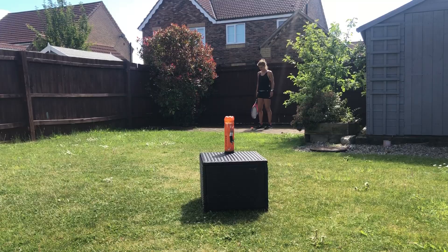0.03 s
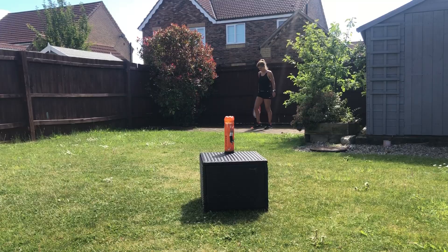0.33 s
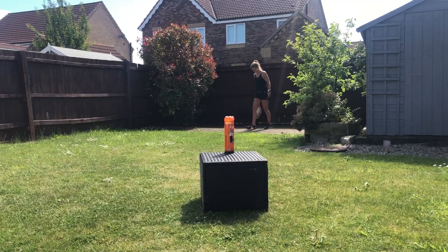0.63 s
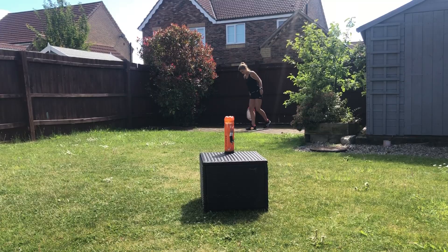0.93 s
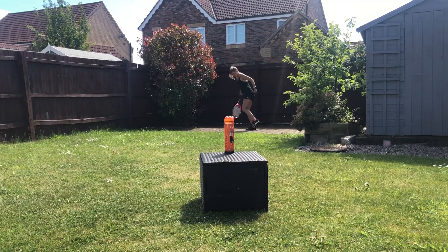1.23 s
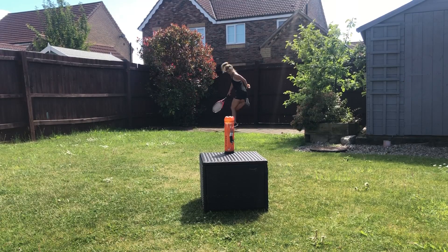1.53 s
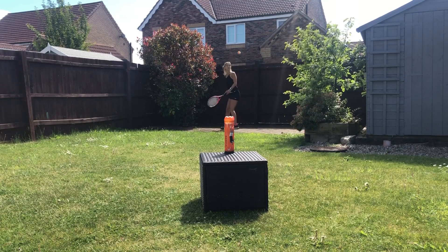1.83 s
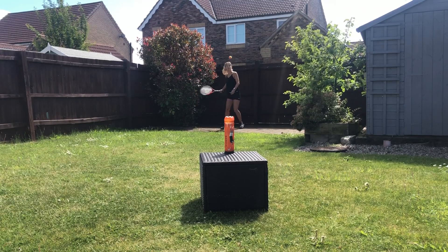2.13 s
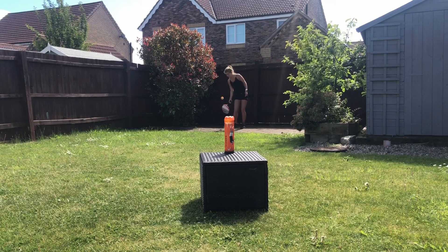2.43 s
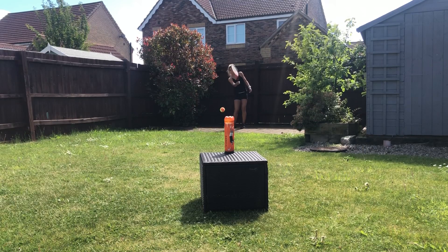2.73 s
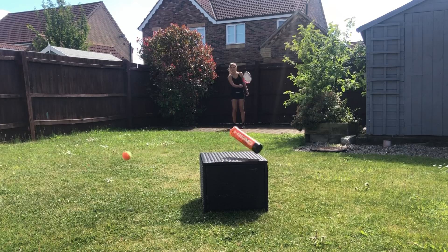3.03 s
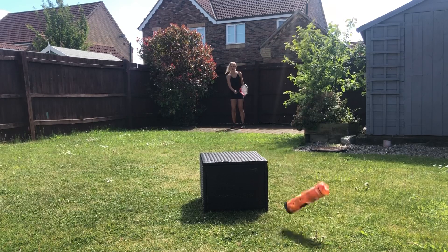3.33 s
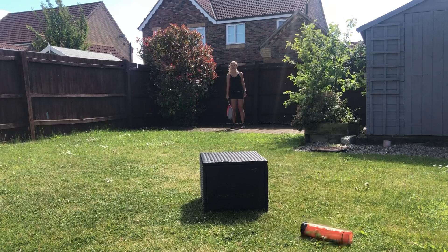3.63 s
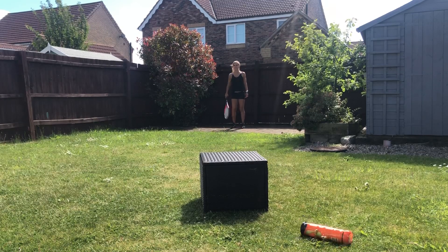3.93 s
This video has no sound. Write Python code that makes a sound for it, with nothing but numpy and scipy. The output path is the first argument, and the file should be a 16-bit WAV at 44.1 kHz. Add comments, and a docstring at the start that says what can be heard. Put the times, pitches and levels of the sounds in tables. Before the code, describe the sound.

A ball cracks against a hollow plastic tube, knocking it onto grass, with faint birds.

```python
"""A fenced garden: at the far end of the lawn a player bounces a ball and hits it with a racket.
The ball knocks a plastic tube off a box near the microphone; the tube clips the box, lands on the
grass and hops. The blows are ringing modes plus contact noise, and fence and walls answer them.
Small birds whistle among the houses over quiet air and a faint machine hum."""
import sys
import numpy as np
from scipy import signal
from scipy.fft import rfft, irfft
from scipy.io import wavfile
from scipy.ndimage import map_coordinates

SR = 44100
rng = np.random.default_rng(int(sys.argv[2]) if len(sys.argv) > 2 else 0)


def file_out(sig):
    """Save sig as 16-bit WAV at sys.argv[1]."""
    # one column per channel
    cols = np.atleast_2d(sig).T
    # limit, then scale
    lim = np.clip(cols, -1, 1)
    pcm = np.round(lim * 32767).astype(np.int16)
    wavfile.write(sys.argv[1], SR, pcm)


N = 176400
T = np.arange(22050) / SR  # time within one blow [s]
BOUNCE_AT, RACKET_AT, TUBE_AT, CLIP_AT, GRASS_AT, LANDING_AT = 1.581, 2.573, 2.9594, 3.1297, 3.419, 3.433

# Hollow ring of the tube, then of the box (pitch [Hz], relative level [dB], t60 [s])
TUBE_MODES = [(170.8, -5, .26), (229, -3, 0.11), (270, -2.5, 0.13), (494, -15, 0.15), (678, -8.5, 0.13),
              (888, -6, 0.12), (1017, -5.5, .12), (1086.5, 1, 0.09), (1157, -2.5, .14), (1526, -12.5, .14),
              (1605, -15.5, .14), (1836, -10.5, 0.13), (2096, -11.5, .1), (2524, -12, .1)]
BOX_MODES = [(229, -1, 0.091), (342, 0.5, 0.12), (426, -14, 0.08)]
# Smack of ball on tube, then of tube on box (frequency [Hz], relative level [dB])
TUBE_NOISE = [(25, -50), (60, -16), (130, -3.5), (280, -4), (550, -17.5), (850, -3), (1150, -2.5),
              (1400, -12), (2050, -7), (3200, -17), (4800, -20), (6500, -29.5), (10000, -32), (15500, -34)]
BOX_NOISE = [(59, -38), (100, -7), (355, 0), (508, -5), (1160, -7), (1400, -12), (2040, -11), (2690, -19),
             (3850, -17.5), (15500, -30)]
def tube_hit():
    """The ball cracks on the hollow tube and sets it ringing; the falling tube clips the box."""
    out = np.zeros(N)
    add(out, TUBE_AT, garden(amp(-16.5) * ring(TUBE_MODES, rise_s=.0033), walls_db=-19, tail_db=-18))
    add(out, TUBE_AT, amp(-9.5) * burst(TUBE_NOISE, rise_s=.0015, stretch=.92, tail_db=-15.5))
    add(out, TUBE_AT, garden(amp(-14) * crack(t60=.0038), walls_db=-6, tail_db=-12.5))
    shed_echo = burst(TUBE_NOISE, rise_s=.006, stretch=.7, tail_db=-22.5)
    add(out, TUBE_AT + .026, amp(-21) * shed_echo)
    add(out, CLIP_AT, amp(-35.5) * burst(BOX_NOISE, rise_s=.002, stretch=1.24, tail_db=-14))
    add(out, CLIP_AT, garden(amp(-25.5) * crack(t60=.0038), walls_db=-10, tail_db=-15))
    add(out, CLIP_AT + .00843, amp(-35) * ring(BOX_MODES, rise_s=.0038))
    return out


# Dull knock of the tube on the lawn (pitch [Hz], relative level [dB], t60 [s])
LANDING_MODES = [(157.6, -1, 0.095), (296, 1, 0.1), (364, -5, 0.14), (477, 7, 0.051), (566, -4.5, 0.1),
                 (875, -9, 0.079), (1077, -8, 0.095)]
# Crunch of blades, thump of the tube's end, slap of its side (frequency [Hz], relative level [dB])
GRASS = [(300, -11.5), (1500, -11.5), (4400, -3), (7000, -11.5), (15000, -14.5)]
THUMP = [(35, -41), (60, -1.5), (162, -14), (234, 7.5), (302, 0), (428, -5.5), (591, 0.5), (780, -5.5),
         (1080, -12), (1520, -22), (15000, -42.5)]
SLAP = [(40, -46), (300, -27), (600, 4), (1100, -3.5), (1600, -25), (15000, -55)]
def tube_landing():
    """The tube crushes the grass and lands end first; its side slaps down just after."""
    out = np.zeros(N)
    blades = noise(GRASS, len(T)) * amp(4.5 * wobble(1210, len(T))) * fade(rise_s=.005, t60=.035)
    add(out, GRASS_AT, garden(amp(-26) * blades, walls_db=-16, tail_db=-12))
    knock = amp(-24.5) * ring(LANDING_MODES, rise_s=.0017)
    add(out, LANDING_AT, garden(knock, walls_db=-18, tail_db=-14.5))
    add(out, LANDING_AT, amp(-21) * burst(THUMP, rise_s=.0042, stretch=1.3, tail_db=-18.5))
    add(out, LANDING_AT + .009, amp(-22) * burst(SLAP, rise_s=.00092, stretch=.63, tail_db=-24.5))
    return out


RATTLES = [(2.963, -28), (2.9668, -25), (2.973, -25), (2.9856, -31), (2.9945, -30.5), (3.132, -39),
           (3.1372, -40), (3.1415, -41)]
GRASS_TICKS = [(.133, -53.5), (3.589, -51), (3.746, -51.5)]
def rattles():
    """Quick secondary contacts of the tube, and blades of grass snapping, close by and dry."""
    out = np.zeros(N)
    for s, db in RATTLES:
        add(out, s, amp(db) * crack(t60=.018))
    for s, db in GRASS_TICKS:
        add(out, s, amp(db) * noise(GRASS, len(T)) * fade(rise_s=.00091, t60=.043))
    return out


# Bright edge of hard plastic (frequency [Hz], relative level [dB])
CRACK = [(30, -41), (300, -17), (2000, 5), (6000, -5), (11500, -3.5), (16000, -7)]
def crack(t60):
    """The first instant of a hard contact: noise with an instant attack."""
    return noise(CRACK, len(T)) * np.exp(-np.log(1000) * T / t60)


# Body of the bounce, then of the racket (pitch [Hz], relative level [dB], t60 [s])
PAVING_MODES = [(256, -1.5, 0.093), (344, -1.5, 0.078), (473, -2.5, 0.064)]
RACKET_MODES = [(198, -2.5, .12), (305, 2.5, .04), (725, -2.5, .07), (925, 0, 0.059), (1304, -12.5, .08),
                (1864, -16, .07), (2515, -19, 0.09)]
# Punch of the same two blows (frequency [Hz], relative level [dB])
PAVING_NOISE = [(59, -51), (100, -12.5), (231, 1.5), (337, -9), (492, -20), (558, -13), (1070, -22),
                (2130, -24.5), (15000, -58.5)]
RACKET_NOISE = [(30, -45), (90, -17.5), (150, -3.5), (300, -1.5), (520, -8.5), (900, 1.5), (1600, -17.5),
                (2200, -20), (4500, -23), (7700, -27.5), (15000, -42)]
def player():
    """Far off, the ball bounces on the paving, echoed by the house, and is then struck by the racket."""
    out = np.zeros(N)
    for delay, db, rise_s in [(0, 3, .00069), (.038, -.5, .007)]:  # bounce, house echo
        contact = burst(PAVING_NOISE, rise_s, stretch=.94, tail_db=-7.5)
        body = garden(ring(PAVING_MODES, rise_s=.0019), walls_db=-15, tail_db=-9.5)
        add(out, BOUNCE_AT + delay, amp(db - 36.5) * contact)
        add(out, BOUNCE_AT + delay + .00695, amp(db - 34.5) * body)
    add(out, RACKET_AT, amp(-30) * garden(ring(RACKET_MODES, rise_s=.003), walls_db=-6, tail_db=-7))
    add(out, RACKET_AT, amp(-28) * burst(RACKET_NOISE, rise_s=.001, stretch=1.1, tail_db=-10))
    return out


# Light steps and taps (time [s], low level [dB], mid level [dB], high level [dB])
TAPS = [(1.187, -49.5, -63, -76), (1.238, -60, -58, -60), (1.862, -41, -53, -70), (1.9, -48.5, -55.5, -76),
        (2.063, -47, -55, -77), (2.1, -47.5, -58.5, -69), (2.719, -45, -58, -62),
        (3.224, -50, -54.5, -59.5), (3.637, -38, -64, -58), (3.746, -54, -50.5, -66.5)]
# Their low, mid and high colours, each a list of (frequency [Hz], relative level [dB])
TAP_BANDS = [
    [(25, -50), (70, -32.5), (200, 9), (500, 2), (1100, -34.5), (5000, -59)],
    [(60, -45), (350, -21.5), (800, 1), (2400, -11.5), (5000, -24.5), (15000, -41)],
    [(100, -45), (1500, -13), (4000, 0), (15000, -15)],
]
# Low thumps of the racket and tube blows, and soft thuds on the ground
# (time [s], settled pitch [Hz], level [dB], t60 [s])
THUDS = [(.555, 70, -44, 0.12), (0.616, 68, -41.5, 0.13), (.895, 66, -44, .2), (1.051, 90, -46, 0.15),
         (2.065, 136, -46.5, 0.16), (2.576, 127, -35, .12), (2.697, 114, -35, 0.091),
         (2.967, 90.4, -25, .1), (3.045, 113, -32.5, .13), (3.312, 139, -39.5, 0.14),
         (3.565, 150, -37, 0.11), (3.638, 254, -34.5, 0.098), (3.694, 99.7, -30, 0.081),
         (3.71, 50.3, -41, .25), (3.766, 63.5, -42.5, .22)]
# Soft rustles of wings, shoes and grass (time [s], length [s], level [dB])
RUSTLES = [(1.231, 0.076, -59.5), (1.343, 0.073, -56), (2.327, 0.2, -48.5), (3.6, 0.059, -59)]
# Their muffled colour (frequency [Hz], relative level [dB])
RUSTLE_NOISE = [(71, -68), (120, -35), (166, -8), (372, -6.5), (484, -9), (616, -21), (785, -19.5),
                (1250, -31), (1730, -22), (3430, -21.5), (15000, -47.5)]
def movement():
    """Light taps, low thumps of racket, tube and ground, and grainy rustles."""
    out = np.zeros(N)
    t = T[:11025]
    for s, *levels in TAPS:
        colour = sum(amp(db) * noise(band, len(t)) for db, band in zip(levels, TAP_BANDS))
        add(out, s, colour * fade(rise_s=.0014, t60=.072)[:len(t)])
    for s, hz, db, t60 in THUDS:
        turns = np.cumsum(hz * (1 + .18 * np.exp(-t / .04))) / SR  # starts sharp and sinks
        tone = np.sin(2 * np.pi * turns + .5 * wobble(70, len(t)))
        add(out, s, amp(db) * tone * fade(rise_s=.007, t60=t60)[:len(t)])
    for s, length, db in RUSTLES:
        swell = np.sin(np.pi * np.clip(t / length, 0, 1))
        add(out, s, amp(db + 2.8 * wobble(120, len(t))) * swell * noise(RUSTLE_NOISE, len(t)))
    return garden(out, walls_db=-10.5, tail_db=-9.5)


# Notes of the twitter, then of one chirp, timed from its cue
# (time [s], length [s], first pitch [Hz], middle pitch [Hz], last pitch [Hz], relative level [dB])
TWITTER_NOTES = [(0.033, .034, 4190, 3770, 3330, -59.5), (0.151, 0.032, 3000, 4200, 5000, -59),
                 (0.17, .031, 6600, 6780, 6700, -64.5), (.19, 0.022, 5220, 5770, 3700, -54),
                 (0.195, 0.0267, 2800, 3740, 3220, -58), (0.222, .021, 3310, 5790, 5300, -51.5),
                 (0.24, 0.027, 3580, 3850, 5200, -52.5), (.259, .04, 4200, 5290, 4180, -49.5),
                 (0.287, .028, 4750, 4480, 4420, -50.5), (.298, 0.034, 5870, 6450, 5050, -59.5)]
CHIRP_NOTES = [(-.026, .026, 4000, 4330, 4300, -14), (0, .046, 4300, 4380, 3950, 0.5),
               (.042, .04, 4350, 4390, 4100, -2.5), (0.069, .04, 4350, 4350, 4200, -8.5),
               (.042, .075, 3800, 3520, 3150, -7), (.118, 0.0504, 3550, 3300, 2910, -13)]
# Cues for the chirp (time [s], relative level [dB], flutter [share of pitch], time stretch [ratio])
CHIRP_CUES = [(.602, -47.5, .003, .95), (1.357, -50, 0.064, 1.15), (3.095, -58.5, 0.049, 1),
              (3.843, -48, .008, .98)]
def birds():
    """A quick swooping twitter and a repeated falling chirp, blurred by the houses."""
    twitter, chirps = np.zeros((2, N))
    for s, *shape, db in TWITTER_NOTES:
        add(twitter, s, amp(db) * bird_note(*shape, flutter=.017, arch=2.1, octave_db=-25.5))
    for cue, level_db, flutter, stretch in CHIRP_CUES:
        for s, length, *pitches, db in CHIRP_NOTES:
            note = bird_note(length * stretch, *pitches, flutter, arch=3, octave_db=-31.5)
            add(chirps, cue + s * stretch, amp(level_db + db) * note)
    twitter = garden(twitter, walls_db=-3.5, tail_db=-3.5, build_s=.012)
    chirps = garden(chirps, walls_db=-3, tail_db=-4, build_s=.019, t60s=[(4000, .42)])
    return amp(-1.5) * twitter + amp(-2) * chirps


def bird_note(length, first_hz, middle_hz, last_hz, flutter, arch, octave_db, trill_hz=95):
    """A sliding, trilling whistle with a weak octave; a higher arch holds the middle pitch longer."""
    t = T[:8820]
    progress = np.clip(t / length, 0, 1)
    end_hz = np.where(progress < .5, first_hz, last_hz)
    hz = middle_hz + (end_hz - middle_hz) * np.abs(2 * progress - 1) ** arch
    rasp = (.0085 + .055 * (middle_hz < 4000)) * wobble(602, len(t))  # low notes are rougher
    trill = flutter * np.sin(2 * np.pi * trill_hz * t + wobble(60.7, len(t)))
    phase = 2 * np.pi * np.cumsum(hz * (1 + rasp + trill)) / SR
    envelope = np.clip(6 * np.minimum(progress, 1 - progress), 0, 1)
    return envelope * (np.sin(phase) + amp(octave_db) * np.sin(2 * phase))


def far_bird(count):
    """Random short notes from a distant bird, heard only as echo."""
    song = np.zeros(N)
    for s, hz, glide in rng.uniform((.1, 3580, -.2), (1.45, 6580, .2), (count, 3)):
        pitches = hz * (1 + glide), hz, hz * (1 - glide)
        add(song, s, bird_note(.051, *pitches, flutter=.029, arch=1, octave_db=-42))
    return amp(-75) * (garden(song, walls_db=-2, tail_db=-1) - song)


# Dark bed of outdoor air (frequency [Hz], relative level [dB])
AIR = [(15, -39), (25, -17), (91, -0.5), (116, -11.5), (193, -15), (313, -16.5), (378, -20.5), (433, -15.5),
       (509, -20), (1410, -25), (2230, -30), (4750, -34.5), (15500, -49.5)]
# Partials of the hum (pitch [Hz], level [dB])
HUM = [(89.5, -62), (178, -74), (357, -69.5), (447, -79.5)]
# Slow fader ride on the hum (time [s], gain [dB])
HUM_RIDE = [(0, -1), (2.6, 0.5), (3.2, -1), (4, 1)]
def background():
    """Quiet outdoor air and a distant, slightly wavering machine hum."""
    air = amp(-60 + .68 * wobble(3.97, N)) * noise(AIR, N)
    t = np.arange(N) / SR
    hum = np.zeros(N)
    for hz, db in HUM:
        peak = np.sqrt(2) * amp(db + 2.3 * wobble(2.99, N))
        hum += peak * np.sin(2 * np.pi * hz * t + .59 * wobble(9, N))
    return air + hum * amp(np.interp(t, *np.transpose(HUM_RIDE)))


# Slapback from fence and shed (delay [s], relative gain [ratio])
WALLS = [(.0072, 0.36), (.0155, 0.26), (.026, .14), (.034, 0.121)]
# Short outdoor tail (frequency [Hz], t60 [s])
GARDEN_T60 = [(100, 0.47), (300, 0.35), (1000, 0.42), (4000, 0.3), (8000, 0.27), (15000, .19)]
def garden(x, walls_db, tail_db, build_s=.014, t60s=GARDEN_T60):
    """Direct sound, echoes from fence and shed, and a diffuse tail."""
    tail = dying(rng.standard_normal(len(T)), t60s) * (1 - np.exp(-T / build_s))
    response = amp(tail_db) * tail / np.linalg.norm(tail)
    response[0] += 1
    for delay, gain in WALLS:
        response[round(delay * SR)] += gain * amp(walls_db)
    return signal.fftconvolve(x, response)[:len(x)]


# Tight decay of contact noise (frequency [Hz], t60 before stretching [s])
CONTACT_T60 = [(100, 0.1), (1000, 0.059), (4000, 0.063), (15000, 0.068)]
def burst(spectrum, rise_s, stretch, tail_db):
    """Contact noise: the many short modes of a struck thing, then their scatter in the garden."""
    t60s = [(hz, t60 * stretch) for hz, t60 in CONTACT_T60]
    direct = dying(noise(spectrum, len(T)), t60s) * (1 - np.exp(-T / rise_s))
    scatter = dying(noise(spectrum, len(T)), GARDEN_T60) * (1 - np.exp(-T / .0048))
    return direct + amp(tail_db) * scatter


def ring(modes, rise_s):
    """The strong modes of a struck thing: damped sines of alternating sign."""
    return sum((-1) ** k * amp(db + rng.normal(0, .7)) * np.sin(2 * np.pi * hz * T) * fade(rise_s, t60)
               for k, (hz, db, t60) in enumerate(modes))


def dying(x, t60s):
    """Let each frequency die at its own speed."""
    hz, t, bands = signal.stft(x, SR, nperseg=256)
    decay = np.exp(-np.log(1000) * t / along(t60s, hz)[:, None])
    return signal.istft(bands * decay, SR, nperseg=256)[1][:len(x)]


def fade(rise_s, t60):
    """Quick rise, exponential decay."""
    return (1 - np.exp(-T / rise_s)) * np.exp(-np.log(1000) * T / t60)


def noise(spectrum, size):
    """Coloured noise of rms 1."""
    colour = amp(along(spectrum, np.fft.rfftfreq(size, 1 / SR)))
    x = irfft(rfft(rng.standard_normal(size)) * colour, size)
    return x / np.sqrt(np.mean(x ** 2) + 1e-20)


def wobble(rate, size):
    """A smooth random curve, rate knots a second."""
    return map_coordinates(rng.standard_normal(4096), [np.arange(size) * rate / SR], mode="wrap")


def along(points, hz):
    """Interpolate (frequency [Hz], value) points on a log axis."""
    knots_hz, values = np.transpose(sorted(points))
    return np.interp(np.log(hz + 1), np.log(knots_hz + 1), values)


def amp(db):
    """Decibels to gain."""
    return 10 ** (np.asarray(db) / 20)


def add(track, s, sound):
    """Mix a sound into the track at s seconds."""
    i = max(0, round(s * SR))
    track[i:i + len(sound)] += sound[:max(0, N - i)]


def scene():
    """The shot and the tumbling tube over the garden ambience, in mono."""
    action = player() + tube_hit() + tube_landing() + movement() + rattles()
    ambience = birds() + far_bird(count=30) + background()
    return (action + ambience)[None]


def record(dry, low_cut_hz=33, top_hz=16300):
    """The sound opens after a moment; the microphone drops the deep bass and the highest treble."""
    opening = np.clip((np.arange(N) / SR - .033) / .005, 0, 1)
    thinned = signal.sosfilt(signal.butter(3, low_cut_hz, "high", fs=SR, output="sos"), dry * opening)
    rolloff = np.clip((top_hz - np.fft.rfftfreq(N, 1 / SR)) / 900 + .5, 0, 1)
    return irfft(rfft(thinned) * rolloff ** 2, N)


dry = scene()
out = record(dry)
file_out(out)
```